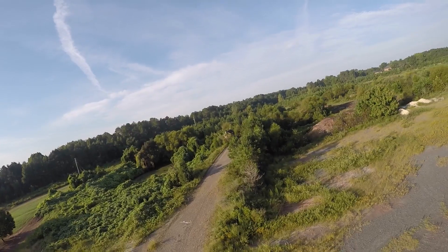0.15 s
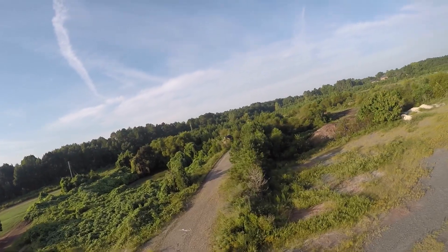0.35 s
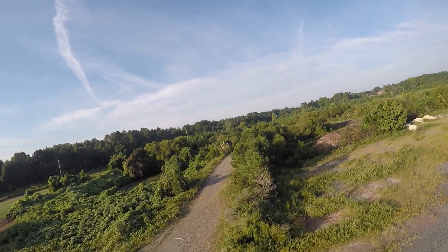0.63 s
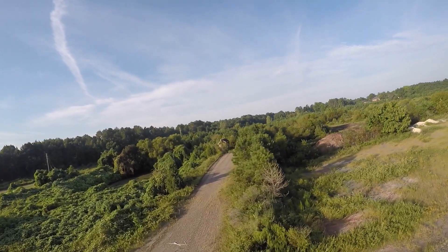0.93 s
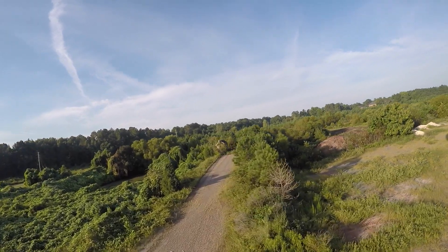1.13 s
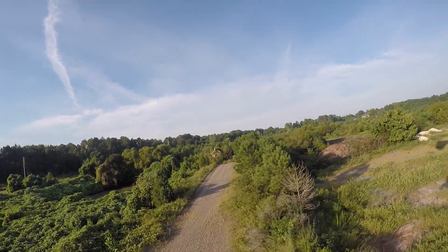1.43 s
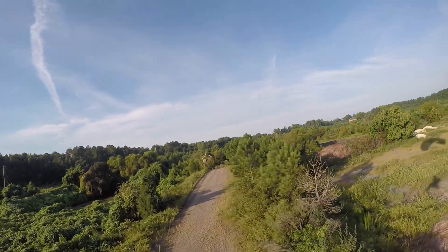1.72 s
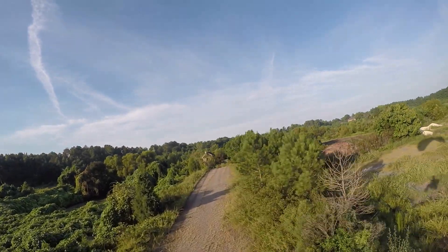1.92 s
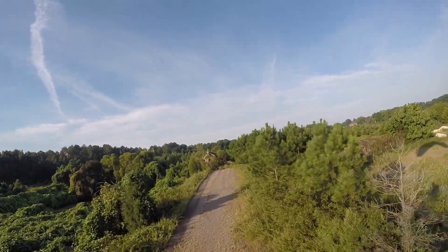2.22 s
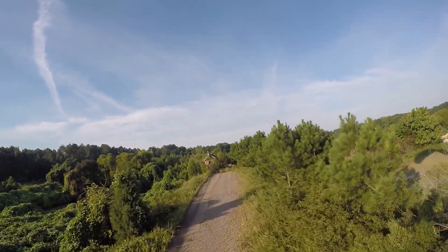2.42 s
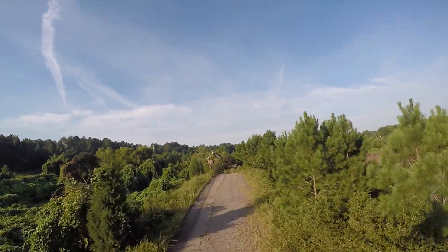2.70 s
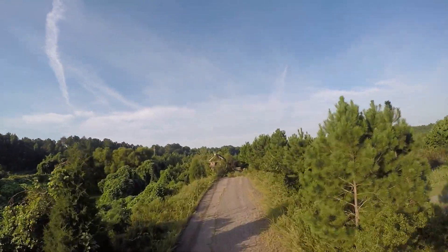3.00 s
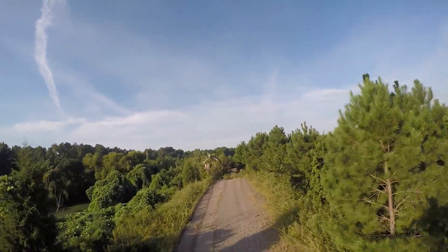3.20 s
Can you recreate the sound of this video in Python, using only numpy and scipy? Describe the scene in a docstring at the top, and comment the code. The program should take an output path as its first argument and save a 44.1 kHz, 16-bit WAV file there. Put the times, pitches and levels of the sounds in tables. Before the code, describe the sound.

Small two-stroke engine sputters in rushing wind, then speeds up into a rapid, softer buzzing rattle.

```python
"""A paramotor's small two-stroke, heard from the harness; sound opens abruptly at 0.05 s.
Idle: pops mostly 3 or 4 turns apart, each two puffs ringing the silencer, a gas rush and a noise rasp;
loose fittings chink, the piston ticks every turn, a low boom fades. From 1.3 s wind and singing lines die down.
From 1.7 s the throttle opens: the crank speeds up, the pipe's pitch rises and sinks, pops become a quick rattle.
Churned air and a hum locked to the crank run throughout; faint opposite noise slightly widens the sound."""
import sys
import numpy as np
from scipy import signal
from scipy.fft import rfft, irfft
from scipy.io import wavfile

SR = 44100
rng = np.random.default_rng(int(sys.argv[2]) if len(sys.argv) > 2 else 0)


def file_out(sig):
    """Save sig as 16-bit WAV at sys.argv[1]."""
    # one column per channel
    cols = np.atleast_2d(sig).T
    # limit, then scale
    lim = np.clip(cols, -1, 1)
    pcm = np.round(lim * 32767).astype(np.int16)
    wavfile.write(sys.argv[1], SR, pcm)


N = 147735
TIME = np.arange(N) / SR


def undb(db):
    """Decibels to amplitude gain."""
    return 10 ** (np.asarray(db) / 20)


def curve(rows, at=TIME):
    """Join rows by straight lines."""
    return np.interp(at, *np.array(rows).T)


def unit(x):
    """Scale to rms 1."""
    return x / np.sqrt(np.mean(x ** 2))


def response(colour, size=4096):
    """Minimum-phase impulse response of unit energy with the given spectrum, by folding the cepstrum."""
    hz, db = np.array(colour).T
    grid_hz = np.maximum(np.arange(size // 2 + 1) * SR / size, 1)
    gain = undb(np.interp(np.log(grid_hz), np.log(hz), db))
    cepstrum = irfft(np.log(gain))
    cepstrum[1:size // 2] *= 2
    cepstrum[size // 2 + 1:] = 0
    h = irfft(np.exp(rfft(cepstrum)))
    return h / np.linalg.norm(h)


def through(x, h):
    """Convolve a sound with a response."""
    return signal.fftconvolve(x, h)[:N]


def noise(colour):
    """Steady coloured noise, rms 1."""
    return unit(through(rng.standard_normal(N), response(colour)))


def walk(rate_hz):
    """Smooth random curve, rms 1: noise under a Gaussian low-pass."""
    hz = np.arange(N // 2 + 1) * SR / N
    spectrum = rfft(rng.standard_normal(N)) * np.exp(-(hz / rate_hz) ** 2)
    return unit(irfft(spectrum, N))


def bursts(times, dbs, rises, decays, colour):
    """Coloured noise that swells to each time and dies away, both exponentially; overlaps add in power."""
    power = np.zeros(N)
    for t, db, rise, decay in np.broadcast(times, dbs, rises, decays):
        near = slice(*np.searchsorted(TIME, [t - .03, t + .07]))
        age = TIME[near] - t
        envelope = undb(db) * np.exp(np.minimum(age / rise, -age / decay))
        power[near] += envelope ** 2
    return through(np.sqrt(power) * rng.standard_normal(N), response(colour))


# crank speed: (time [s], speed [turns/s])
CRANK_SPEED = [(0, 41), (1.1, 40), (1.65, 34.5), (2.17, 54), (2.55, 56.5), (2.8, 62.5), (3.35, 71)]
IDLE_HZ = 40


def crank_turns():
    """Crank angle in turns: integrated speed, bent to a whole number at every firing."""
    free = np.cumsum(curve(CRANK_SPEED)) / SR
    at_firing = np.interp([row[0] for row in FIRINGS], TIME, free)
    steps = np.maximum(np.round(np.diff(at_firing)), 1)
    whole = np.append(0, np.cumsum(steps))
    return free + np.interp(free, at_firing, whole - at_firing)


def idling(times):
    """1 up to idle speed, falling to 0 at 10 turns/s above it."""
    return np.clip(1 - (curve(CRANK_SPEED, times) - IDLE_HZ) / 10, 0, 1)


# firings: (time [s], puff level before trims [dB], rasp level before trim [dB])
FIRINGS = [(0.073, -57, -48), (0.147, -34.5, -44), (0.219, -35, -48), (0.294, -36, -56),
           (0.346, -32, -44.5), (0.419, -31.5, -40.5), (0.517, -33.5, -43.5), (0.616, -34, -43),
           (0.719, -35.5, -53.5), (0.795, -35, -43), (0.87, -33, -50), (0.946, -33.5, -45),
           (1.02, -36, -43.5), (1.12, -37, -44.5), (1.197, -31, -44.5), (1.272, -36.5, -54),
           (1.381, -38, -47.5), (1.459, -37, -54), (1.543, -41.5, -59), (1.661, -43, -73),
           (1.712, -37, -52), (1.822, -43, -58), (1.877, -36.5, -52), (1.9291, -46.5, -52),
           (1.9776, -40.5, -51.5), (2.0213, -42.5, -50.5), (2.0659, -46.5, -51), (2.109, -44, -52.5),
           (2.1477, -42.5, -51), (2.1851, -41, -52), (2.2222, -41.5, -51.5), (2.2595, -41.5, -53.5),
           (2.2959, -42, -51.5), (2.3312, -42, -52), (2.3673, -43, -54), (2.4029, -43.5, -53.5),
           (2.4393, -44, -54), (2.4751, -44, -53), (2.5115, -44.5, -53.5), (2.5472, -42, -51.5),
           (2.5827, -46.5, -54.5), (2.6173, -49, -52.5), (2.6517, -44, -54), (2.6854, -44.5, -54),
           (2.7186, -46.5, -54.5), (2.7512, -50.5, -55), (2.7843, -44.5, -53.5), (2.8321, -44, -55.5),
           (2.8639, -48.5, -57.5), (2.896, -51, -56), (2.9278, -49.5, -57), (2.959, -44, -56.5),
           (3.0047, -43, -56), (3.0505, -47, -55), (3.095, -47, -59.5), (3.1394, -45.5, -58.5),
           (3.211, -47, -57.5), (3.2415, -55, -66), (3.2681, -50, -60), (3.2961, -52, -70),
           (3.3238, -49.5, -79)]
# puff spectrum: (frequency [Hz], relative density [dB per Hz])
PUFF_COLOUR = [(40, -47), (150, -1.5), (270, 3.5), (400, 3.5), (620, -4), (850, -12), (1200, -6),
               (1500, -41), (2200, -36), (5000, -21), (10000, -34)]
# silencer and frame modes: (frequency [Hz], t60 [s], level [dB])
SILENCER_MODES = [(466, .04, -13.5), (883, 0.065, -3), (1115, 0.043, -10.5), (1320, 0.083, -10.5)]
# exhaust pipe pitch: (time [s], frequency [Hz])
PIPE_PITCH = [(1.95, 310), (2.25, 378), (2.4, 358), (2.55, 305)]
PUFF_GAP_S, FIRST_PUFF_DB, PUFF_SCATTER_DB = 0.002856, -10.5, 3  # first puff is relative to the second
PUFF_DB, IDLE_PUFF_DB = -5, -6  # trims
PIPE_T60_S, PIPE_DB = 0.13, -4.5


def exhaust():
    """Two pulses per firing excite the puff spectrum, decaying silencer modes and a pipe of moving pitch."""
    times, puff_db, _ = np.array(FIRINGS).T
    scatter = undb(PUFF_SCATTER_DB * rng.standard_normal(len(times)))
    # one-sample pulse with the energy of 5 ms at this rms level
    size = undb(puff_db + PUFF_DB + IDLE_PUFF_DB * idling(times)) * np.sqrt(.005 * SR)
    second = np.clip((times * SR).astype(int), 0, N - 1)
    first = np.clip(((times - PUFF_GAP_S) * SR).astype(int), 0, N - 1)
    puffs = np.zeros(N)
    puffs[second] += size
    puffs[first] += size * scatter * undb(FIRST_PUFF_DB)

    age = TIME[:SR // 5]
    ring = 0
    for hz, t60_s, db in SILENCER_MODES:
        mode = np.sin(2 * np.pi * hz * age) * np.exp(-np.log(1000) * age / t60_s)
        ring = ring + undb(db) * mode / np.linalg.norm(mode)

    # shift the pipe pitch to 0 Hz, decay there, shift back
    angle = 2 * np.pi * np.cumsum(curve(PIPE_PITCH)) / SR
    fade = np.exp(-np.log(1000) * age / PIPE_T60_S)
    stored = through(puffs * np.exp(-1j * angle), fade / np.linalg.norm(fade))
    pipe = (np.exp(1j * angle) * stored).real
    return through(puffs, response(PUFF_COLOUR)) + through(puffs, ring) + undb(PIPE_DB) * pipe


GUSH_DB, GUSH_RISE_S, GUSH_DECAY_S = -3.5, 0.0023, 0.0074


def gush():
    """At idle, turbulent gas rushes hollowly around the puffs: noise bursts in the puff spectrum."""
    times, dbs, _ = np.array(FIRINGS).T
    rush = bursts(times - PUFF_GAP_S, dbs + GUSH_DB, GUSH_RISE_S, GUSH_DECAY_S, PUFF_COLOUR)
    return idling(TIME) * rush


# rasp spectrum: (frequency [Hz], relative density [dB per Hz])
RASP_COLOUR = [(200, 5.5), (600, 8.5), (1100, 1), (2000, 1), (4000, -3), (6200, -3), (9000, -4),
               (11500, -8.5), (15500, -13.5)]
RASP_DB, RASP_LEAD_S = 3.5, 0.0017
RASP_RISE_S, RASP_DECAY_S = .0024, 0.01
IDLE_RISE_S, IDLE_DECAY_S = .0045, .0095


def rasp():
    """Burning gas tears out of the port at each firing; the lazy burn at idle swells more slowly."""
    times, _, dbs = np.array(FIRINGS).T
    lazy = idling(times)
    rise_s = RASP_RISE_S + lazy * (IDLE_RISE_S - RASP_RISE_S)
    decay_s = RASP_DECAY_S + lazy * (IDLE_DECAY_S - RASP_DECAY_S)
    return bursts(times - RASP_LEAD_S, dbs + RASP_DB, rise_s, decay_s, RASP_COLOUR)


# tick level: (time [s], level [dB])
TICK_LEVEL = [(0, -59), (1.0, -56), (1.25, -52), (1.62, -50.5), (1.9, -62), (2.1, -68), (2.6, -66),
              (3.35, -61)]
# tick spectrum: (frequency [Hz], relative density [dB per Hz])
TICK_COLOUR = [(1900, -22), (2900, 6), (4400, -23), (5200, 3.5), (5900, -4.5), (6400, -1), (7100, 1),
               (8000, -5.5), (9700, -2), (10400, -2), (10900, -7.5), (15500, -15.5)]
TICK_LEAD_TURNS, TICK_SCATTER_DB = .31, 1.2
TICK_RISE_S, TICK_DECAY_S = .0018, .003


def piston(turns):
    """A bright metallic noise tick every turn, fired or not, ahead of the firing angle."""
    ticks = np.flatnonzero(np.diff(np.floor(turns + TICK_LEAD_TURNS)) > 0)
    dbs = curve(TICK_LEVEL, TIME[ticks]) + TICK_SCATTER_DB * rng.standard_normal(len(ticks))
    return bursts(TIME[ticks], dbs, TICK_RISE_S, TICK_DECAY_S, TICK_COLOUR)


# level of the churned air: (time [s], level [dB])
CHURN_LEVEL = [(0, -61), (1.7, -57), (2.3, -54), (2.8, -53), (3.35, -55.5)]
# churn spectrum: (frequency [Hz], relative density [dB per Hz])
CHURN_COLOUR = [(35, -38), (80, -7), (200, -5), (330, -0.5), (450, -4), (560, -5.5), (850, -7), (1320, -12),
                (1520, -32.5), (9000, -30.5)]
# crank and propeller hum: (multiple of crank speed [ratio], level relative to churn [dB])
HUM = [(1, -9.5), (2, -15.5), (2.52, -11.5), (6, -22)]
CHURN_DEPTH = 0.21


def running(turns, waver_db=2):
    """Churned air, noise throbbing once a turn, plus wavering sines locked to the crank."""
    churn = noise(CHURN_COLOUR) * (1 + CHURN_DEPTH * np.cos(2 * np.pi * turns))
    hum = 0
    for multiple, db in HUM:
        tone = np.sqrt(2) * np.sin(2 * np.pi * multiple * turns)
        hum = hum + undb(db + waver_db * walk(14.0)) * tone
    return (churn + hum) * undb(curve(CHURN_LEVEL))


# loose fittings: (frequency [Hz], peak level [dB])
FITTINGS = [(5600, -47), (9200, -49.5)]
CHINK_S, SHAKING_ENDS_S = 0.00068, 1.8


def fittings(count=15, scatter_db=3, detune=0.096):
    """Loose fittings chink as the idling engine shakes the frame: short sines at random times and pitches."""
    out = np.zeros(N)
    for hz, db in FITTINGS:
        for when, size, pitch in rng.uniform(-1, 1, (count, 3)):
            age = TIME - SHAKING_ENDS_S * (when + 1) / 2
            near = np.abs(age) < 10 * CHINK_S
            tone = np.sin(2 * np.pi * hz * (1 + detune * pitch) * age[near])
            envelope = np.exp(-(age[near] / CHINK_S) ** 2)
            out[near] += undb(db + scatter_db * size) * envelope * tone
    return out


SLOWING_PER_S = .025  # share of the starting airspeed lost each second


def wavering(hz, width_hz, waver_db=2):
    """A tone shed by the wind; it wanders in pitch and level, and sinks with the airspeed."""
    pitch_hz = hz * (1 - SLOWING_PER_S * TIME) + width_hz / 2 * walk(25.2)
    angle = 2 * np.pi * np.cumsum(pitch_hz) / SR
    return undb(waver_db * walk(29)) * np.sin(angle)


# wind buffeting: (time [s], level [dB])
WIND_LEVEL = [(0, -44), (1.0, -44), (1.3, -44.5), (1.5, -49), (1.7, -53.5), (2.5, -60), (3.35, -74)]
# wind spectrum: (frequency [Hz], relative density [dB per Hz])
WIND_COLOUR = [(15, -43), (30, -24), (60, 2), (125, -0.5), (200, -1), (380, -3), (560, -8.5), (880, -9.5),
               (1400, -20.5), (4000, -39), (12000, -84)]
# tones shed by lines and frame: (frequency at start [Hz], width [Hz], level relative to wind [dB])
WHISTLES = [(315, 11.4, -3.5), (832, 46.3, -14)]
GUST_DB = .8
BOOM_HZ, BOOM_DB, BOOM_FADE_DB_PER_S = 122.8, -42, 20


def wind():
    """Gusty noise and singing lines share one level; a low boom fades steadily from the start."""
    air = noise(WIND_COLOUR) * undb(GUST_DB * walk(7.0))
    lines = sum(undb(db) * wavering(hz, width_hz) for hz, width_hz, db in WHISTLES)
    boom = wavering(BOOM_HZ, 10.8) * undb(BOOM_DB - BOOM_FADE_DB_PER_S * TIME)
    return (air + lines) * undb(curve(WIND_LEVEL)) + boom


# wind hiss: (time [s], level [dB])
HISS_LEVEL = [(0, -54.5), (1.1, -55), (1.35, -57), (1.65, -61.5), (2.6, -65), (3.35, -67)]
# hiss spectrum: (frequency [Hz], relative density [dB per Hz])
HISS_COLOUR = [(500, -8.5), (1500, 4.5), (2400, 4), (3500, 3), (9000, -4), (11500, -8.5), (15500, -6)]
FLUTTER_DB = 1


def hiss():
    """Air over the harness: noise with a fast random flutter."""
    return noise(HISS_COLOUR) * undb(curve(HISS_LEVEL) + FLUTTER_DB * walk(86))


# spectrum of the bright side noise: (frequency [Hz], relative density [dB per Hz])
SIDE_BRIGHT_COLOUR = [(500, 4), (3000, -3.5), (15500, 2.5)]
SIDE_LOW_DB, SIDE_BRIGHT_DB = -31.5, -18  # relative to the wind and hiss levels


def side_noise():
    """Faint separate noise, a low and a bright band, following the wind and hiss levels."""
    low = undb(SIDE_LOW_DB + curve(WIND_LEVEL)) * noise(WIND_COLOUR)
    bright = undb(SIDE_BRIGHT_DB + curve(HISS_LEVEL)) * noise(SIDE_BRIGHT_COLOUR)
    return low + bright


def scene():
    """Every source is central; faint noise, opposite in sign in each ear, slightly widens the sound."""
    turns = crank_turns()
    engine = exhaust() + gush() + rasp() + piston(turns) + running(turns) + fittings()
    centre = engine + wind() + hiss()
    return centre + side_noise() * np.array([[1], [-1]])


START_S, TOP_HZ = .052, 15350


def record(dry):
    """Silence until the start, a 2 ms fade-in, and a steep low-pass."""
    opened = np.clip((TIME - START_S) / .002, 0, 1)
    low_pass = signal.ellip(10, .2, 70, TOP_HZ, fs=SR, output="sos")  # order, ripple dB, stopband dB
    return signal.sosfilt(low_pass, dry * opened)


dry = scene()
out = record(dry)
file_out(out)
```